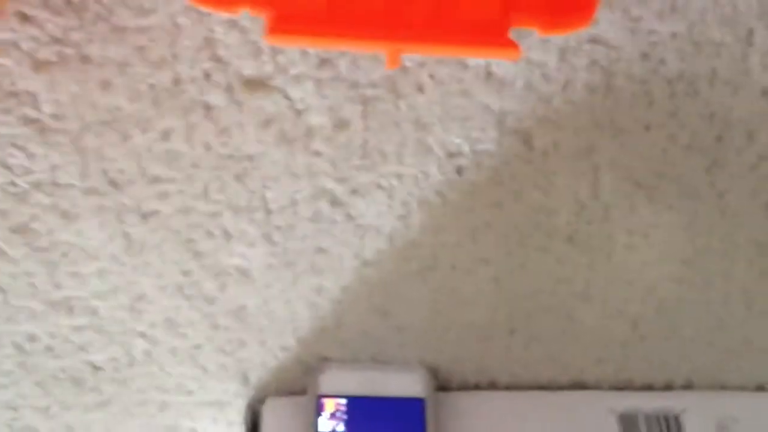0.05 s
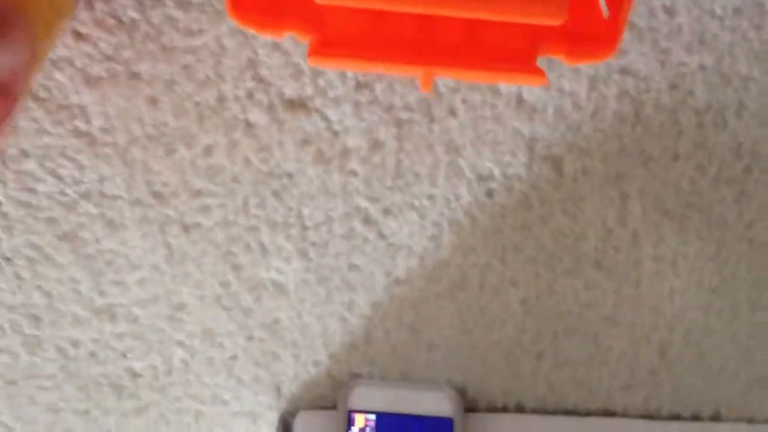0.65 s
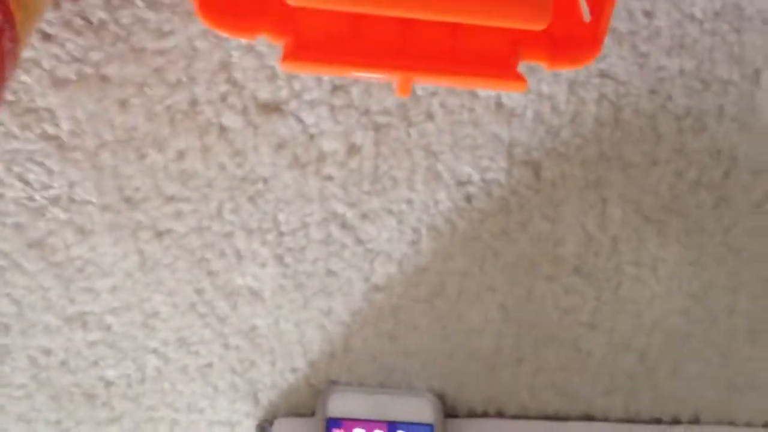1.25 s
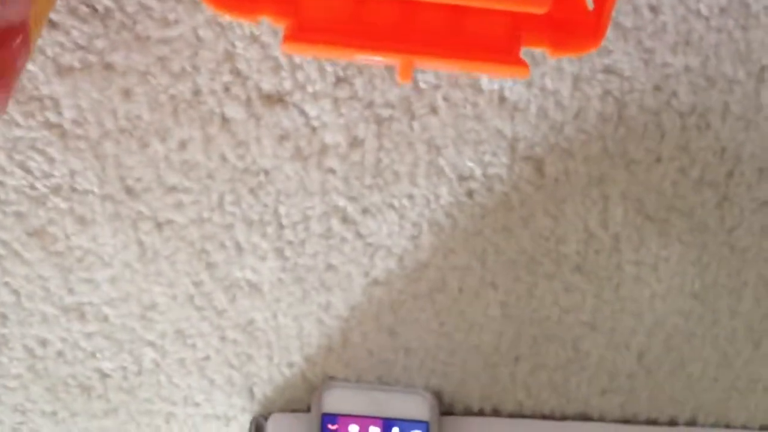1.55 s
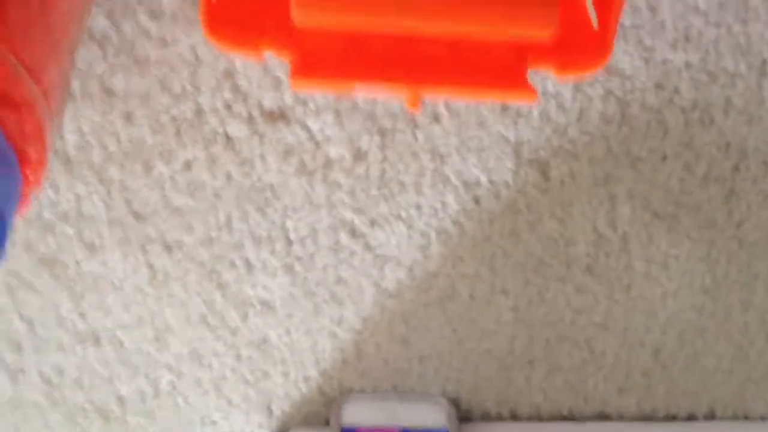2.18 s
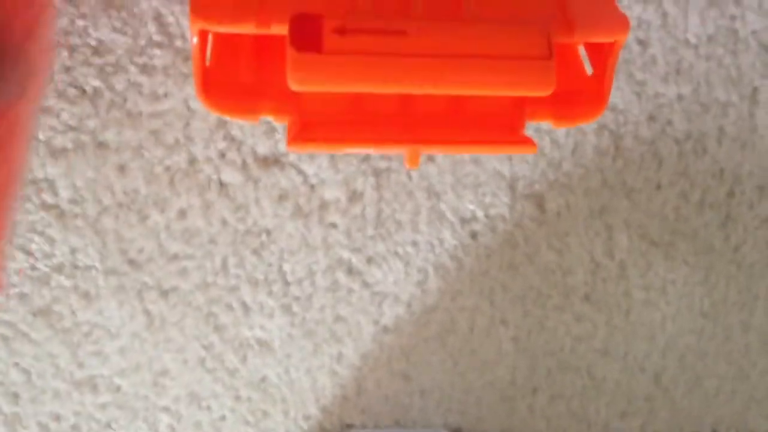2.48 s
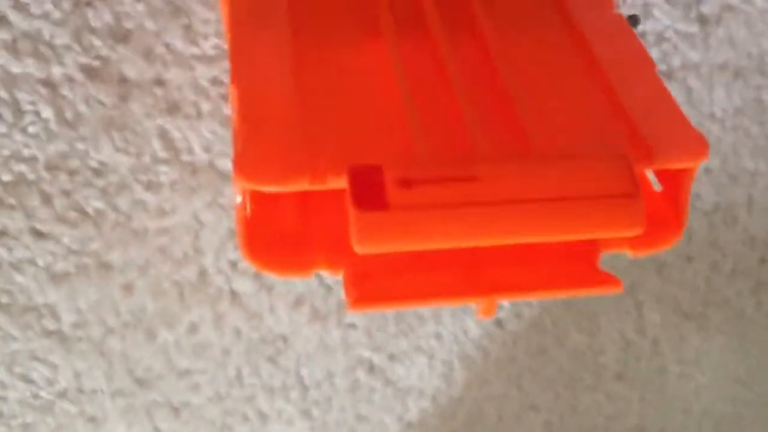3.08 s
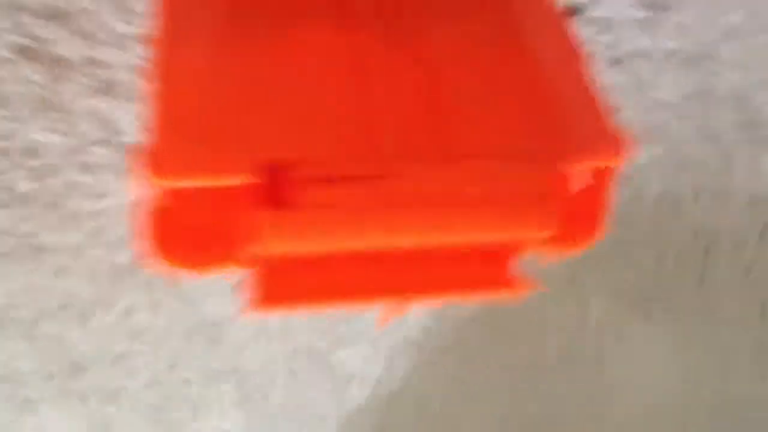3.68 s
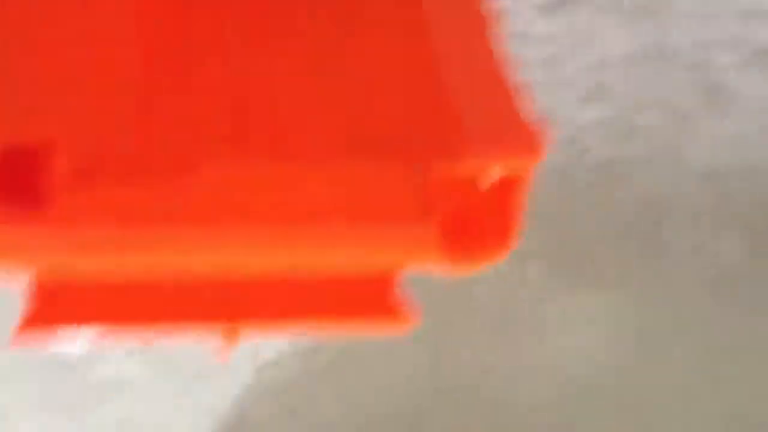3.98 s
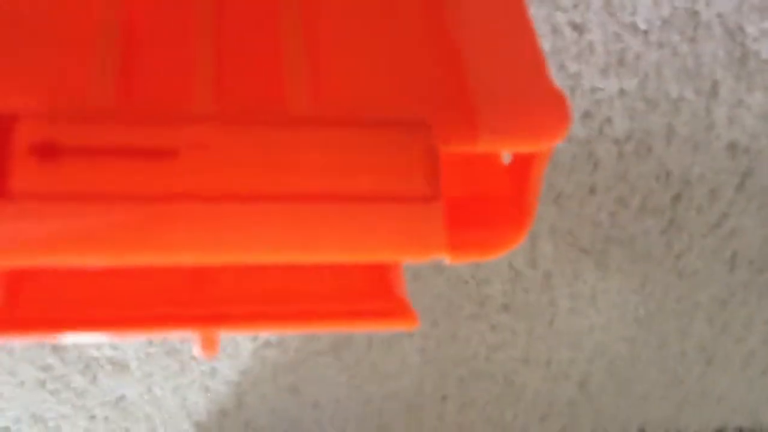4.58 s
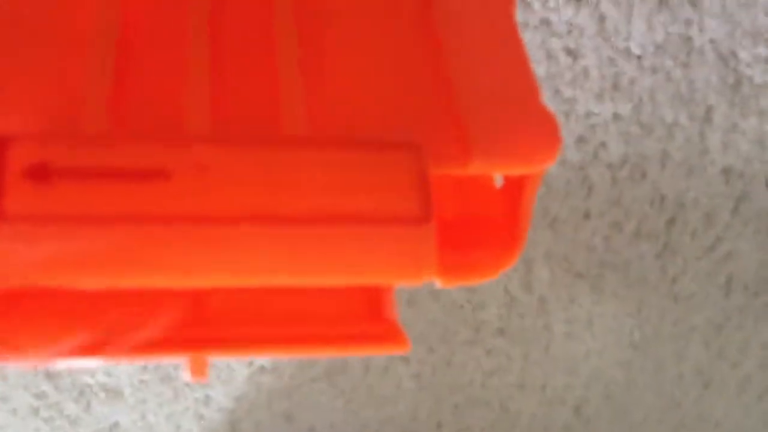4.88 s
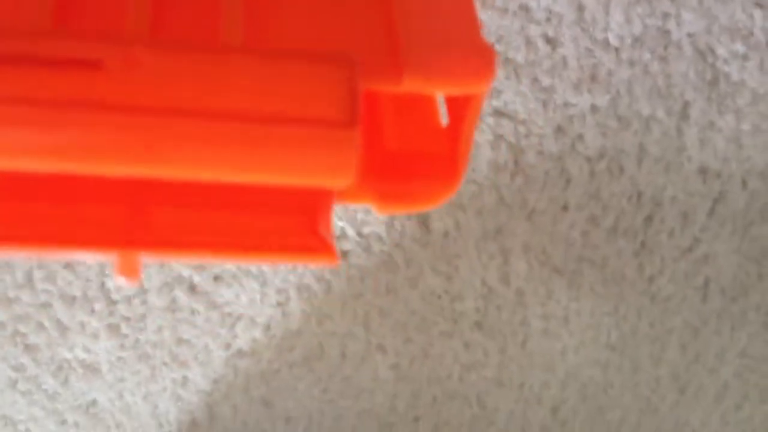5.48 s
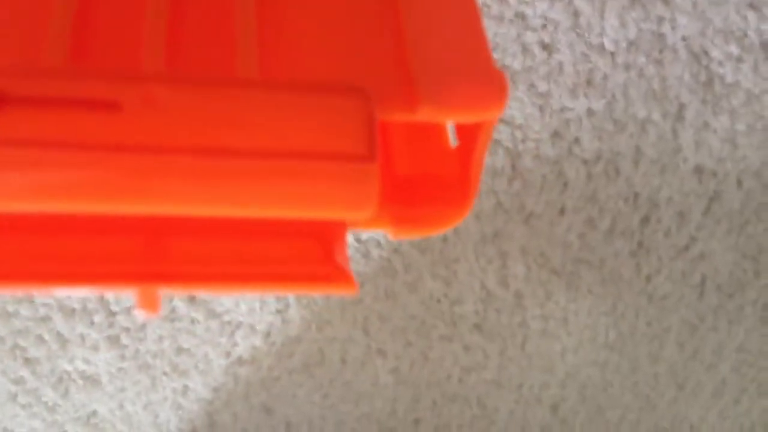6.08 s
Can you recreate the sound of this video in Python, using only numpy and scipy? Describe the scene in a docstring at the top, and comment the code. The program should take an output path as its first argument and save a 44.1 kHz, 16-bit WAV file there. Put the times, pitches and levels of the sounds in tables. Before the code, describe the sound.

Faint clicks of plastic pellets shifting, two loud rattling surges, then a bright, hollow clatter as they pour into a toy magazine.

```python
"""Sparse, dry clicks come first: plastic pellets shifting in a hand-held container, close to the
microphone in a small carpeted room. The container is tipped and the pellets surge twice, then pour
into a hollow toy magazine. Pellet on pellet gives a brief click; pellet on magazine rings its shell
and cavity. The last pellets bounce to rest over a faint room hum and a background hiss."""
import sys
import numpy as np
from scipy import signal
from scipy.fft import rfft, irfft, next_fast_len
from scipy.io import wavfile
from scipy.ndimage import uniform_filter1d, minimum_filter1d

SR = 44100
rng = np.random.default_rng(int(sys.argv[2]) if len(sys.argv) > 2 else 0)


def wav_record(signal):
    """Record a signal, one row per channel, as 16-bit PCM in the file named by sys.argv[1]."""
    frames = np.transpose(np.atleast_2d(signal))
    bounded = np.clip(frames, -1, 1)
    # unit amplitude maps onto the largest positive 16-bit level
    quanta = np.round(bounded * 32767).astype(np.int16)
    wavfile.write(sys.argv[1], SR, quanta)


N = 279594

# background hiss, ducking after the loud crash and slowly recovering: (time [s], relative level [dB])
HISS_LEVEL = [(0.06, -69), (0.28, -73.5), (2.7, -73.5), (3.3, -83.5), (3.65, -79.5), (4.28, -72.5),
              (4.4, -75), (6.3, -76)]
# spectra of the room hum and the background hiss: (frequency [Hz], relative level [dB])
HUM_COLOUR = [(25, -37.5), (55, -31), (100, -5.5), (170, -2.5), (212, 3), (270, -7.5), (340, -7.5),
              (600, -16.5), (1200, -25), (2500, -21), (6000, -45)]
HISS_COLOUR = [(200, -8), (700, 5), (2000, -0.5), (4800, -1), (6200, -2), (9500, -5.5), (15000, -2)]
# decay of the carpeted room: (frequency [Hz], time to fall 60 dB [s])
ROOM_DECAY = [(200, 0.12), (1500, 0.52), (6000, 0.28), (14000, 0.037)]

# soft handling bumps, plus low microphone thumps under loud hits: (time [s], level [dB], pitch [Hz])
BUMPS_AND_THUMPS = [(2.846, -49, 59.95), (2.849, -42.5, 161.6), (3.164, -49, 190), (3.43, -63, 170),
                    (3.886, -45, 195.3), (4.846, -55, 50), (4.984, -49, 190), (5.264, -58.5, 50),
                    (5.387, -51.5, 170)]
# a finger dragging on the plastic: (time [s], level [dB])
RUB_LEVEL = [(3.36, -86), (3.46, -73.5), (3.56, -87)]
# spectrum of that drag: (frequency [Hz], relative level [dB])
RUB_COLOUR = [(200, -32), (1200, -19), (1700, -1), (2100, -1.5), (2600, -11.5), (5000, -13), (12000, -27)]
# rustles as the grip shifts the pile: (time [s], level [dB])
RUSTLES = [(0.34, -71), (0.52, -59.5), (0.78, -64.5), (1.04, -65.5), (1.12, -70), (1.5, -63), (1.82, -64.5),
           (2.27, -69), (2.665, -64.5)]
# the clearest pellet clicks: (time [s], relative level [dB], pitch [Hz])
CLICKS = [(0.3694, -39.5, 8780), (0.3742, -39.5, 8390), (0.4198, -41, 8500), (0.538, -38, 6200),
          (0.5561, -37, 6500), (0.5968, -26.5, 9650), (0.6753, -24.5, 5660), (0.8395, -38.5, 3940),
          (0.904, -31, 6300), (0.91, -31.5, 6300), (0.9223, -25.5, 9500), (0.9742, -33, 8600),
          (1.0675, -41, 6800), (1.4355, -31.5, 6200), (1.5366, -30.5, 6200), (1.5935, -28.5, 5900),
          (1.6422, -31.5, 9100), (1.8452, -39.5, 6200), (1.8956, -32, 11200), (1.9121, -28, 8800),
          (1.9266, -28.5, 5820), (1.9743, -33, 8650), (2.0015, -41, 5900), (2.0355, -35.5, 7800),
          (2.1196, -44, 6080), (2.5002, -44, 6200), (2.7196, -40, 6480), (2.7739, -24.5, 9200),
          (2.7861, -23.5, 6200), (2.9474, -6.5, 7950), (3.031, -11.5, 7550), (3.1053, -19, 6500),
          (3.1347, -15, 10460), (3.1619, -27.5, 8660), (3.174, -31, 5900), (3.259, -40, 10400),
          (3.4267, -41, 4540), (3.7484, -24, 5940), (3.8173, -11.5, 9150), (3.8686, -9, 10800),
          (3.8859, -3.5, 9900), (3.916, -6, 8860), (3.974, -4, 10700), (4.0063, -6.5, 8600),
          (4.051, -20.5, 6500), (4.0796, -23.5, 6800), (4.1243, -24, 9750), (4.1587, -16, 6540),
          (4.1976, -17.5, 6660), (4.2292, -22, 7940), (4.2454, -29, 8400), (4.339, -40, 6580),
          (4.4973, -20.5, 6200), (4.5561, -5.5, 6960), (4.565, -7.5, 6800), (4.5755, -11, 6950),
          (4.6026, -10.5, 9100), (4.6193, -4.5, 7500), (4.6387, 0.5, 7540), (4.6539, 2, 7000),
          (6.1963, -40.5, 3907), (6.245, -37.5, 3410)]
# the tipped mass hits the wall and sloshes back: (time [s], relative level [dB], rise [dB/s])
CRASHES = [(2.841, -9.5, 1281), (2.94, -18.5, 479), (3.032, -30, 350)]

# flow of pellets in each movement: (time [s], relative level [dB])
SHAKE_FLOW = [(3.73, -55), (3.79, -50.5), (3.816, -28.5), (3.892, -18), (3.982, -25.5), (4.11, -71)]  # shaken back
STRAGGLER_FLOW = [(4.16, -51), (4.2, -56), (4.26, -60)]  # a few rolling on
SLIDE_FLOW = [(4.42, -70.5), (4.5, -35), (4.56, -28.5), (4.64, -24.5), (4.708, -25), (4.72, -44)]  # sliding to the container's mouth
POUR_FLOW = [(4.69, -36), (4.85, -24.5), (4.91, -35), (4.98, -25.5), (5.22, -22), (5.28, -30), (5.42, -26),
             (5.57, -36.5), (5.75, -39), (5.81, -51), (5.93, -43.5)]  # falling into the magazine
SETTLE_FLOW = [(5.7, -68), (5.915, -44.5), (5.97, -66)]  # chattering to rest on the pile
# spectrum of the rattle in each movement: (frequency [Hz], relative level [dB])
CREEP_COLOUR = [(350, -59), (600, -41), (887, -19.5), (1160, -8.5), (1520, -17), (3230, -6), (5250, -2),
                (6000, -1), (11500, -3.5), (15000, -18.5)]
SURGE_COLOUR = [(88, -48), (150, -35.5), (578, -26.5), (787, -28.5), (900, -23), (1380, -16), (1870, -17),
                (2600, -11), (3540, -10.5), (4120, -7), (7500, 0), (12900, -6.5), (15000, -10)]
SHAKE_COLOUR = [(88, -75.5), (150, -43), (196, -35), (515, -31), (1090, -15), (1180, -24.5), (2180, -18.5),
                (2500, -22.5), (4050, -13), (5100, -11), (6180, -2), (10200, -1.5), (15000, -6.5)]
SLIDE_COLOUR = [(88, -65), (150, -47), (306, -26), (393, -35), (589, -27.5), (636, -31.5), (1130, -12),
                (1320, -16.5), (2180, -14.5), (3970, -17.5), (7500, -2), (9630, -12.5), (15000, -14)]
SETTLE_COLOUR = [(300, -32), (600, -7.5), (950, 4), (1250, -29.5), (1800, -13.5), (2230, 7.5), (2650, -3.5),
                 (4200, -3), (4900, 9), (5400, -7), (6800, 4), (8500, -4), (9600, 9.5), (11500, -21),
                 (15000, -11)]

# the magazine's body, air column and walls: (frequency [Hz], bandwidth [Hz], relative level [dB])
MAGAZINE_MODES = [(90, 54, -48), (223, 43, -38), (310, 26, -28.5), (488, 22, -23.5), (741, 25, -13),
                  (786, 39, -17.5), (898, 31, -14.5), (996, 27.5, -11.5), (1231, 22, -18), (1433, 24, -21),
                  (2104, 105, -14), (2303, 50, -9), (2817, 63, -9.5), (3090, 53, -5.5), (3943, 68, -0.5),
                  (4250, 48, -1.5), (4770, 53.6, -2), (6100, 94, -3), (6750, 60, -2.5), (7610, 45, -1),
                  (8780, 150, -3), (10030, 18, 1), (13260, 255, 1)]
# its crowded wall modes: (frequency [Hz], relative level [dB])
WALL_COLOUR = [(60, -48.5), (200, -37), (600, -31), (900, -17.5), (1600, -21), (2300, -9.5), (2600, -17),
               (4200, -1.5), (4900, -2.5), (5400, -5), (6300, -1.5), (11000, -1.5), (13500, 0),
               (15000, -7.5)]
# the hardest falls into it: (time [s], relative level [dB], hardness [dB])
STRIKES = [(4.7047, -10, -8), (4.7267, -12.5, -1), (4.7501, 0.5, 4), (4.765, -8, 1), (4.7966, -4.5, -1),
           (4.817, -3.5, 2), (4.829, -2, -3), (4.8454, 2, -3.5), (4.9318, -4.5, -1), (4.9565, -4, -2),
           (4.9795, -4, -9), (4.9904, -2.5, 4), (5.0078, -5.5, 1), (5.017, -1, 6), (5.0357, -4, 10),
           (5.0527, -8, 11), (5.0843, -4.5, 3), (5.097, -5, 6), (5.1066, -5.5, -5.5), (5.1215, -3.5, -4),
           (5.1557, -2, 9), (5.1675, -3.5, 3), (5.2334, -7, -11.5), (5.2636, -1, 12), (5.2854, -4.5, 0),
           (5.2954, -7.5, 10), (5.3233, -4.5, 1), (5.3323, -7, 10), (5.3562, -3.5, 12), (5.3869, 0, 6),
           (5.3934, -2, 0.5), (5.4092, -5, -3), (5.4378, -6, 6.5), (5.4797, -11, -2), (5.5215, -7.5, 10),
           (5.5392, -8, -3), (5.5931, -6, 10.5), (5.603, -9, 0), (5.6375, -11.5, 1)]


def amp(db):
    """Decibels to gain."""
    return 10 ** (np.asarray(db) / 20)


def unit(x):
    """Scaled to rms 1."""
    return x / np.sqrt(np.mean(x ** 2) + 1e-20)


def along(points, hz):
    """(frequency [Hz], value) points read on a log axis."""
    frequencies, values = np.transpose(points)
    return np.interp(np.log(hz + 1), np.log(frequencies + 1), values)


def level(curve):
    """(time [s], level [dB]) points as one gain per sample, silent outside their span."""
    return amp(np.interp(np.arange(N) / SR, *np.transpose(curve), left=-140, right=-140))


def coloured(x, spectrum, size=4096):
    """Minimum-phase filter with the given spectrum; white input keeps its power."""
    gain = unit(amp(along(spectrum, np.fft.rfftfreq(size, 1 / SR))))
    cepstrum = irfft(np.log(np.maximum(gain, 1e-5)))
    cepstrum[1:size // 2] *= 2
    cepstrum[size // 2 + 1:] = 0
    return signal.fftconvolve(x, irfft(np.exp(rfft(cepstrum))))[:N]


def noise(spectrum):
    """Steady coloured noise at rms 1."""
    return unit(coloured(rng.standard_normal(N), spectrum))


def fade(t, t60):
    """Exponential decay, 60 dB down after t60 seconds."""
    return np.exp(-np.log(1000) * t / t60)


def place(times, shapes):
    """Sum of one short waveform per time."""
    index = np.round(np.asarray(times) * SR).astype(int)[:, None] + np.arange(shapes.shape[1])
    return np.bincount(index.ravel(), shapes.ravel(), N)[:N]


def swells(peaks, fall_db_per_s):
    """A flow curve from peaks (time [s], level [dB], rise [dB/s]) that build up and die away."""
    s, db, rise = np.transpose(peaks)[:, :, None]
    t = np.linspace(s.min() - .06, s.max() + .2, 1000)
    each_db = db - np.maximum(rise * (s - t), fall_db_per_s * (t - s))
    power = np.sum(amp(each_db) ** 2, axis=0)
    return np.column_stack([t, 10 * np.log10(power + 1e-20)])


def arrivals(flow, rate, spread_db):
    """Random contacts, `rate` a second: many small, a few large, all growing with the flow."""
    s, db = np.transpose(flow)
    count = int((s[-1] - s[0]) * rate) + 1
    jitter, strength = rng.random((count, 2)).T
    times = s[0] + (s[-1] - s[0]) * (np.arange(count) + 2 * jitter) / (count + 1)
    return times, amp(np.interp(times, s, db) + spread_db * strength ** 2)


def at_flow_level(x, flow):
    """A stream of contacts brought to the overall rms of its flow curve."""
    return unit(x) * np.sqrt(np.mean(level(flow) ** 2))


def background():
    """A steady low room hum, and a soft hiss that ducks after the loud crash and slowly recovers."""
    hiss_db = np.interp(np.arange(N) / SR, *np.transpose(HISS_LEVEL))
    return amp(-74.5) * noise(HUM_COLOUR) + amp(hiss_db + 4) * noise(HISS_COLOUR)


def room_tail(x):
    """Short reverberation, 4 ms behind the direct sound; the midrange lingers longest."""
    hz, t, spectra = signal.stft(rng.standard_normal(SR // 2), SR, nperseg=256)
    tail = signal.istft(spectra * fade(t, along(ROOM_DECAY, hz)[:, None]), SR, nperseg=256)[1]
    response = np.pad(tail / np.linalg.norm(tail), (SR // 250, 0))
    return signal.fftconvolve(x, response)[:N]


def thuds():
    """Damped low tones: soft handling bumps, and 50-60 Hz microphone thumps under loud hits."""
    s, db, hz = np.transpose(BUMPS_AND_THUMPS)[:, :, None]
    t = np.arange(SR // 8) / SR
    thud = np.sin(2 * np.pi * hz * t) * fade(t, .06) * (1 - np.exp(-t / .0071))
    return place(s[:, 0], amp(db) * thud)


def finger(squeak_s=3.158, squeak_hz=1160, octaves_per_s=21):
    """A finger slips on the plastic with a short rising squeak, then drags softly."""
    t = np.arange(SR // 8) / SR
    from_centre = t - t.mean()
    phase = 2 * np.pi * np.cumsum(squeak_hz * 2 ** (octaves_per_s * from_centre)) / SR
    glide = amp(-63.5) * np.sqrt(2) * np.sin(phase) * np.exp(-(from_centre / .023) ** 2)
    squeak = place([squeak_s - t.mean()], glide[None])
    return squeak + level(RUB_LEVEL) * noise(RUB_COLOUR)


def rattle(flow, colour, rate, spread_db, t60, wall_db):
    """Many pellets colliding: tiny cracks, each with a ring of the container wall."""
    times, sizes = arrivals(flow, rate, spread_db)
    t = np.arange(SR // 80) / SR
    envelope = fade(t, t60) + amp(wall_db) * fade(t, .043)
    cracks = rng.standard_normal((len(times), len(t))) * envelope
    return at_flow_level(coloured(place(times, sizes[:, None] * cracks), colour), flow)


def creep(flurry_rise_db_per_s=519.5, rustle_rise_db_per_s=445):
    """The pile stirs in the hand: a flurry round each click before the first crash, and soft rustles."""
    flurry_peaks = [(s, db - 28, flurry_rise_db_per_s) for s, db, _ in CLICKS if s < CRASHES[0][0]]
    rustle_peaks = [(s, db, rustle_rise_db_per_s) for s, db in RUSTLES]
    flurry_flow = swells(flurry_peaks, fall_db_per_s=229.5)
    rustle_flow = swells(rustle_peaks, fall_db_per_s=64.5)
    flurries = rattle(flurry_flow, CREEP_COLOUR, rate=380, spread_db=22.5, t60=.003, wall_db=-1)
    rustles = rattle(rustle_flow, CREEP_COLOUR, rate=200, spread_db=17.5, t60=.003, wall_db=-10.5)
    return flurries + rustles


def clicks(lag_s=.001):
    """Single collisions up close: a high ping, a crack and a dull knock that weighs more in soft ones."""
    s, db, hz = np.transpose(CLICKS)[:, :, None]
    t = np.arange(SR // 30) / SR
    shape = (len(s), len(t))
    ping = np.sin(2 * np.pi * hz * t) * fade(t, .0024) * (1 - np.exp(-t / .00007))
    wall_ring = amp(-27) * fade(t, .07)
    crack = rng.standard_normal(shape) * (amp(-9) * fade(t, .0033) + wall_ring)
    knock = rng.standard_normal(shape) * amp(-27.5 - .22 * db) * fade(t, .0072)
    # (frequency [Hz], relative level [dB])
    ping_colour = [(60, -40.5), (500, -23), (3000, 0), (6000, -3.5), (15000, .5)]
    bright = [(80, -49), (300, -27), (1200, -13), (4000, -11.5), (6500, 6.5), (10000, 2.5), (15000, -5)]
    dull = [(50, -34.5), (180, -19), (600, -11.5), (1100, 2.5), (2500, 0), (5000, 2), (12000, -28.5)]
    return sum(coloured(place(s[:, 0] + lag_s, amp(db) * part), colour)
               for part, colour in [(ping, ping_colour), (crack, bright), (knock, dull)])


def tilts():
    """Pellets crash along the container, are shaken back and slide to its mouth."""
    surge_flow = swells(CRASHES, fall_db_per_s=254.5)
    surge = rattle(surge_flow, SURGE_COLOUR, rate=1500, spread_db=9.5, t60=.0038, wall_db=-12)
    shake = rattle(SHAKE_FLOW, SHAKE_COLOUR, rate=600, spread_db=14.5, t60=.0028, wall_db=-15.5)
    stragglers = rattle(STRAGGLER_FLOW, SHAKE_COLOUR, rate=130, spread_db=20, t60=.0025, wall_db=-36)
    slide = rattle(SLIDE_FLOW, SLIDE_COLOUR, rate=340, spread_db=21, t60=.0024, wall_db=-16)
    return amp(2.2) * surge + amp(-1.2) * shake + amp(-4) * stragglers + amp(-6.5) * slide


def magazine(times, sizes, shell_db, ping_db, ring_db, wall_db, crack_db, wall_t60, detune):
    """Each blow lands on a new spot of a shifting pile, so modes ring at new strengths and pitches."""
    t = np.arange(SR // 8) / SR
    ring = np.zeros((len(times), len(t)))
    for hz, width, db in MAGAZINE_MODES:
        sign, spot, load = rng.standard_normal((3, len(times), 1))
        emphasis_db = shell_db * (2500 < hz < 5500) + ping_db * (hz > 12000)
        strength = amp(ring_db + db + 3.1 * spot + emphasis_db) * width / 300
        age = t[t < 2 / width]
        wave = np.cos(2 * np.pi * hz * (1 + detune * load) * age) * np.exp(-np.pi * width * age)
        ring[:, :len(age)] += np.sign(sign) * strength * wave
    ring[:, 0] /= 2  # a blow pushes no net air
    buzz = amp(wall_db + .33 * shell_db) * fade(t, wall_t60)
    crack = amp(crack_db + .4 * (ping_db - shell_db)) * fade(t, .0027)
    bursts = rng.standard_normal(ring.shape) * (buzz + crack)
    walls = coloured(place(times, sizes[:, None] * bursts), WALL_COLOUR)
    return place(times, sizes[:, None] * ring) + walls


def pour():
    """The stream of lesser falls into the magazine, ending in a fine chatter."""
    times, sizes = arrivals(POUR_FLOW, rate=230, spread_db=11)
    stream = magazine(times, sizes, shell_db=-1, ping_db=-12.5, ring_db=-7, wall_db=-11.5,
                      crack_db=-9.5, wall_t60=.041, detune=.0086)
    chatter = rattle(SETTLE_FLOW, SETTLE_COLOUR, rate=250, spread_db=7, t60=.0078, wall_db=-22)
    return amp(-1.5) * at_flow_level(stream, POUR_FLOW) + amp(-2) * chatter


def bounces(count=10, start_s=5.664, flight_s=.0495, shrink=.82, first_db=-9, loss_db=2.5, hard_db=1):
    """One last pellet bounces ever faster and softer; columns as in STRIKES."""
    bounce = np.arange(count)
    flights = flight_s * shrink ** bounce
    times = start_s + np.cumsum(flights) - flights
    return np.column_stack([times, first_db - loss_db * bounce, np.full(count, hard_db)])


def strikes(lag_s=.001):
    """Foreground falls and last bounces: soft blows favour the shell, hard ones the highest mode."""
    s, db, hardness_db = np.vstack([STRIKES, bounces()]).T
    return magazine(s + lag_s, amp(db), shell_db=-hardness_db[:, None], ping_db=hardness_db[:, None],
                    ring_db=-13, wall_db=-15.5, crack_db=-19.5, wall_t60=.04, detune=.014)


def scene():
    """One microphone close to container and magazine: mostly direct sound, little of the room."""
    container = clicks() + creep() + tilts()
    filling = strikes() + pour()
    reflections = room_tail(amp(-18.5) * container + amp(-17) * filling)
    return (container + filling + reflections + thuds() + finger() + background())[None]


def record(dry, ceiling=.8, top_hz=15400):
    """After the microphone, a fast limiter holds the sharpest peaks and a steep low-pass follows."""
    needed_gain = np.minimum(1, ceiling / (np.abs(dry) + 1e-9))
    limited = dry * uniform_filter1d(minimum_filter1d(needed_gain, size=65), size=65)
    size = next_fast_len(N + SR // 4)
    hz = np.fft.rfftfreq(size, 1 / SR)
    low_pass = 1 / np.sqrt(1 + (hz / top_hz) ** 160)
    return irfft(rfft(limited, size) * low_pass, size)[:, :N]


dry = scene()
out = record(dry)
wav_record(out)
```